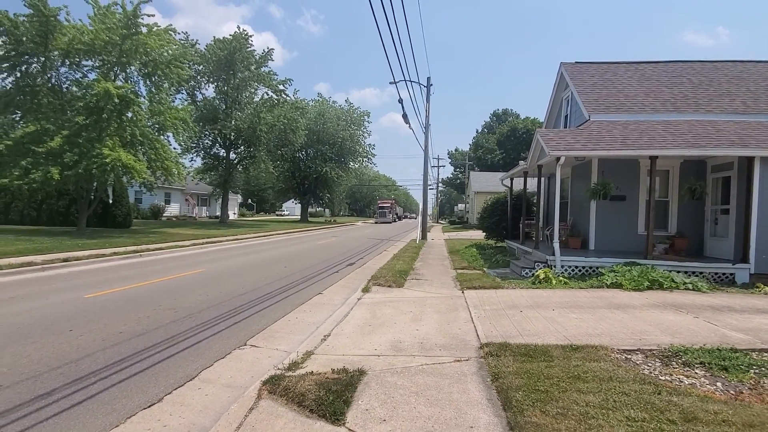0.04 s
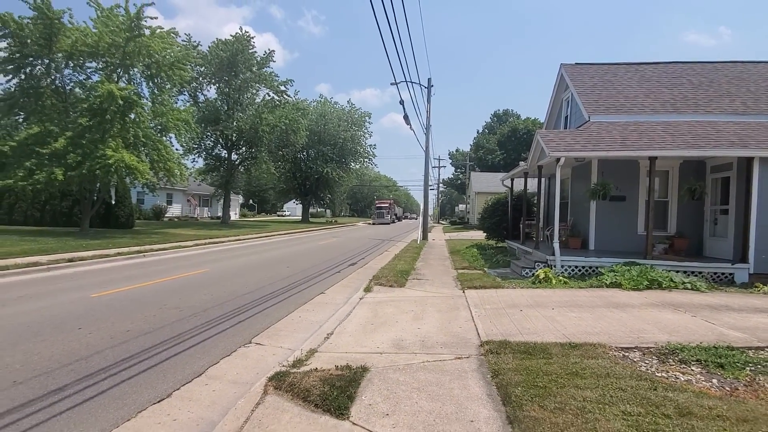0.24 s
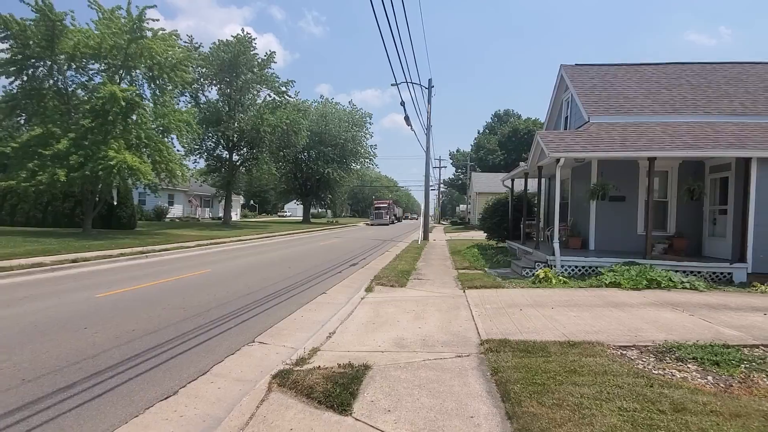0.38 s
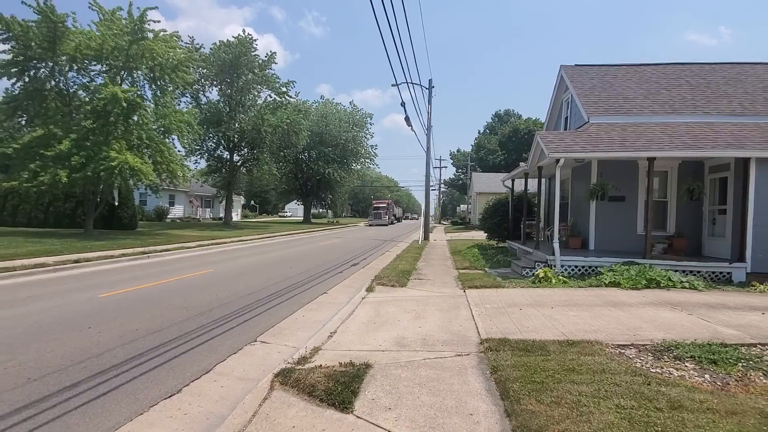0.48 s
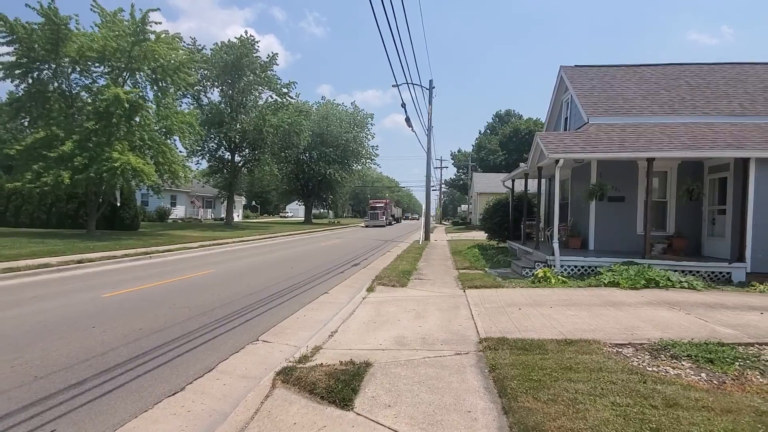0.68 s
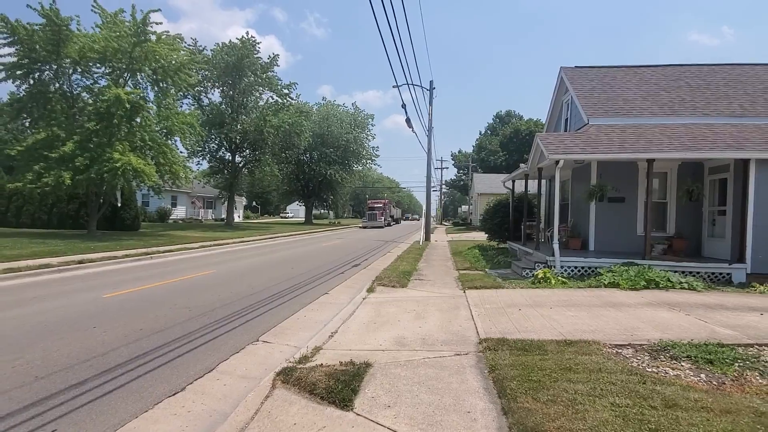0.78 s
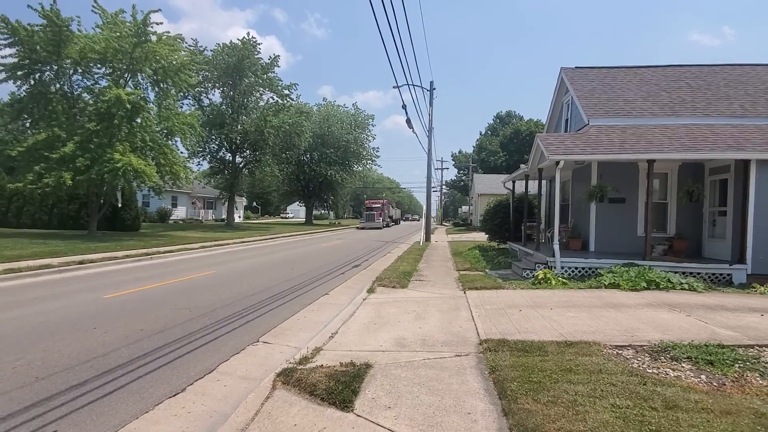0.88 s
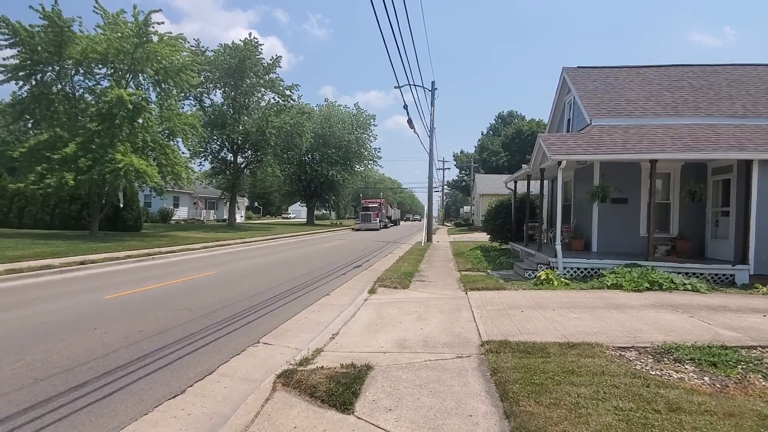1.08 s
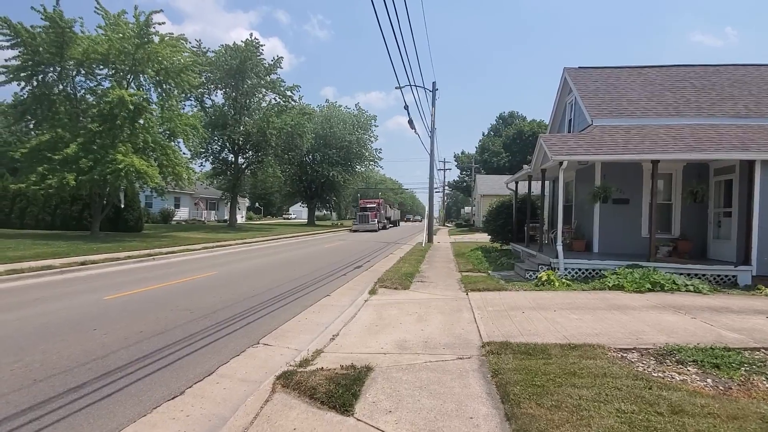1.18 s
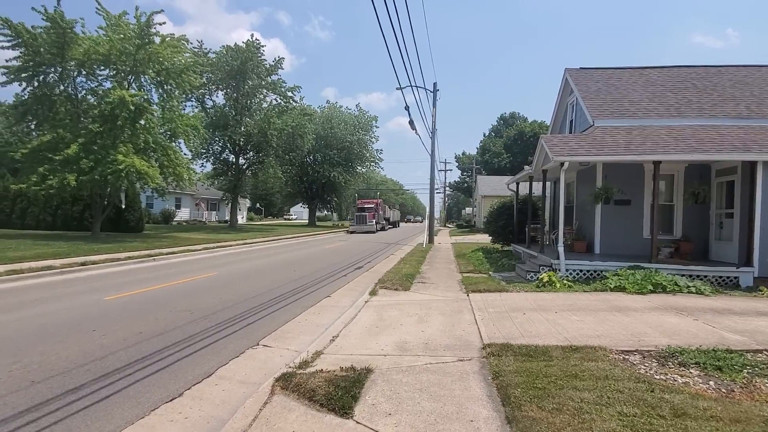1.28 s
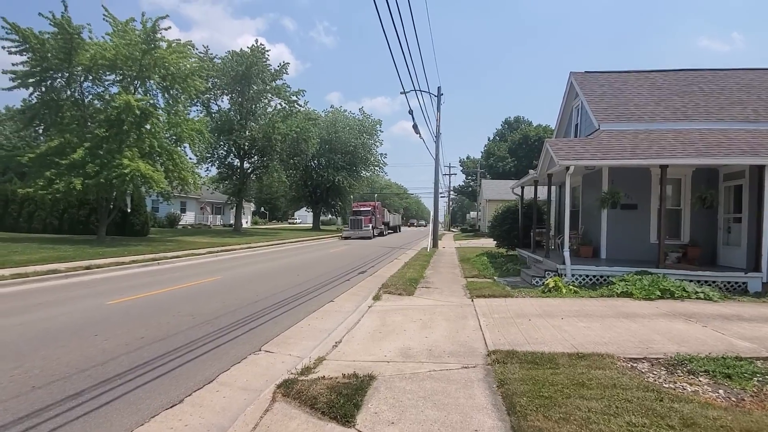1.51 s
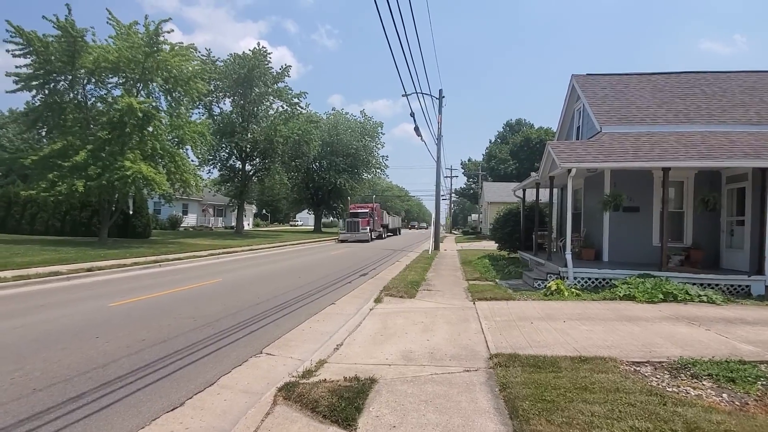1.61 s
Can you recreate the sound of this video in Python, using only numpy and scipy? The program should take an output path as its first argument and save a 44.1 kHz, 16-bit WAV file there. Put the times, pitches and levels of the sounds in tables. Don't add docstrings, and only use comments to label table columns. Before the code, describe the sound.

A truck air horn blasts twice in quick succession, echoing off houses over low traffic rumble.

```python
import sys
import numpy as np
from scipy import signal
from scipy.fft import rfft, irfft, next_fast_len
from scipy.io import wavfile
from scipy.ndimage import map_coordinates

SR = 44100
rng = np.random.default_rng(int(sys.argv[2]) if len(sys.argv) > 2 else 0)


def field_ratio(decibels):
    return 10 ** (np.asarray(decibels, dtype=float) / 20)


def put_to_file(sound):
    columns = np.atleast_2d(sound).T
    safe = np.clip(columns, -1, 1)
    whole_steps = np.round(safe * 32767)
    wavfile.write(sys.argv[1], SR, whole_steps.astype(np.int16))


N = 72765
T = np.arange(N) / SR


def unit(x):
    return x / np.sqrt(np.mean(x ** 2) + 1e-20)


def along(points, hz):
    f, v = np.transpose(points)
    return np.interp(np.log(hz + 1), np.log(f + 1), v)


def wobble(rate_hz):
    knots = rng.standard_normal(int(N * 40 / SR) + 4)
    return map_coordinates(knots, [np.arange(N) * min(rate_hz, 40) / SR])


def filtered(x, response):
    m = next_fast_len(N + SR // 2)
    gain = response(np.fft.rfftfreq(m, 1 / SR))
    return irfft(rfft(x, m) * gain, m)[..., :N]


def rush(spectrum, alike):
    a, b = filtered(rng.standard_normal((2, N)), lambda hz: field_ratio(along(spectrum, hz)))
    u = np.arccos(np.clip(alike, 0, 1)) / 2
    left = np.cos(u) * a + np.sin(u) * b
    right = np.cos(u) * a - np.sin(u) * b
    return unit(np.array([left, right]))


# (time [s], level [dB])
GUST_LEVELS = [(0.0, -40), (0.026, -33.5), (0.334, -40), (0.352, -35), (0.426, -48), (0.458, -34.5),
               (1.028, -41.5), (1.25, -52), (1.304, -39), (1.502, -45), (1.558, -37), (1.65, -39)]
# (frequency [Hz], level [dB])
RUMBLE_SPECTRUM = [(15, -35), (25, -13), (40, -6), (60, 1), (95, 0.5), (125, -11), (170, -48)]
ENGINE_HZ, ENGINE_DB = 52.1, -2


def rumble():
    level = field_ratio(ENGINE_DB + 1.7 * wobble(8.8))
    hz = ENGINE_HZ * (1 + 0.032 * wobble(7.7))
    engine = level * np.sin(2 * np.pi * np.cumsum(hz) / SR)
    gust = field_ratio(np.interp(T, *np.transpose(GUST_LEVELS)) - 1.0)
    return gust * (rush(RUMBLE_SPECTRUM, alike=0.25) + engine) * field_ratio([[-3], [3]])


# (frequency [Hz], level [dB])
ROAD_SPECTRUM = [(90, -27), (140, -0.5), (280, -5), (400, -8), (650, -7), (1300, -9), (2900, -15),
                 (3800, -26), (6000, -70)]
# (frequency [Hz], level [dB])
FAR_SPECTRUM = [(3000, -33), (3600, 0), (8300, -9.5), (8800, -26), (12000, -42), (15500, -56)]
ROAD_DB, FAR_DB = -35, -53.5


def road_noise():
    near = field_ratio(ROAD_DB + 1.44 * wobble(5.88)) * rush(ROAD_SPECTRUM, alike=0.61)
    return near + field_ratio(FAR_DB) * rush(FAR_SPECTRUM, alike=0.16)


OPEN_S, ATTACK_S, SHUT_S, RELEASE_S = 0.203, 0.025, 1.311, 0.033


def valve(delay_s, shut_offset_s, slow=1):
    rise = np.clip((T - OPEN_S - delay_s) / ATTACK_S, 0, 1) ** 1.5
    return rise * np.exp(-np.maximum(T - SHUT_S - shut_offset_s, 0) / (slow * RELEASE_S))


FLUTTER_DB = 2.5
SHARP, SETTLE_S = 0.014, 0.0397
SAG_PER_DB, RELEASE_SAG, JITTER = 0.0005, 0.035, 0.001206
BODY_FOLLOWS, EDGE_FOLLOWS = 0.29, 0.22
BLARE_DB_PER_OCT, BLARE_S, BLARE_WIDE_S = 3, 0.2724, 0.049
ROLL_DB_PER_OCT, UNEVEN_DB = 12, 1


def trumpet(hz, delay_s, shut_offset_s, levels_db, drop_db):
    settle = np.exp(-np.maximum(T - OPEN_S - delay_s, 0) / SETTLE_S)
    bend = 1 + SHARP * settle + SAG_PER_DB * drop_db + JITTER * wobble(25.04)
    bend -= RELEASE_SAG * np.tanh(np.maximum(T - SHUT_S - shut_offset_s, 0) / 0.09)
    phase = 2 * np.pi * np.cumsum(hz * bend) / SR
    blare = np.exp(-((T - BLARE_S) / BLARE_WIDE_S) ** 2)
    edge_db = EDGE_FOLLOWS * drop_db + BLARE_DB_PER_OCT * blare * (hz / 683) ** 3
    reed = 0
    for k in range(1, 13):
        if k <= 6:
            db = levels_db[k - 1]
        else:
            db = levels_db[-1] - ROLL_DB_PER_OCT * np.log2(k / 6) + UNEVEN_DB * rng.normal()
        level_db = db + BODY_FOLLOWS * drop_db + np.log2(k) * edge_db
        flutter_db = FLUTTER_DB * np.tanh(k / 2) * wobble(13.97)
        reed = reed + field_ratio(level_db + flutter_db) * np.cos(k * phase + rng.normal(0, 0.38))
    opening = valve(delay_s, shut_offset_s, (683 / hz) ** 1.5)
    return opening * np.sqrt(2) * reed, phase


# (multiples of low, mid, high trumpet [ratio], level [dB], drift [dB/s])
AIR_LINE_TONES = [((1, 0, 1), -51.5, 4.3), ((0, 1, 1), -45.5, -1.5), ((-1.1, 0.94, 1), -43, -7),
                  ((-1, 2, 0.99), -30.5, -23), ((-2, 2, 0.99), -28.5, -22)]


def sum_tones(phases, drop_db):
    out = np.zeros(N)
    for times, db, drift_db_s in AIR_LINE_TONES:
        tone = np.sqrt(2) * np.sin(np.dot(times, phases))
        level_db = db + drift_db_s * T + drop_db + FLUTTER_DB * wobble(7.93)
        out += valve(0.03, -0.053) * field_ratio(level_db) * tone
    return out


# (frequency [Hz], level [dB])
HISS_SPECTRUM = [(1200, -20), (3000, -5), (4000, -3.5), (5000, -6.5), (8300, -4), (8800, -11), (13500, -16),
                 (15700, -26)]
HISS_DB, GATED = -39.5, 0.32


def air_puffs(phases, drop_db):
    gate = np.sum(np.cos(phases), axis=0)
    puffs = unit(rush(HISS_SPECTRUM, alike=0.99)[0] * np.exp(GATED * gate))
    return valve(0.0046, -0.051) * field_ratio(HISS_DB + drop_db) * puffs


# (time [s], level [dB])
AIR_PRESSURE = [
    (0.236, -44),
    (0.278, -31.5),
    (0.458, -41),
    (0.572, -50.5),
    (0.656, -37),
    (1.048, -36),
    (1.178, -38.5),
    (1.376, -53.5),
    (1.4, -54),
]
# (pitch [Hz], delay [s], shut offset [s], levels of partials 1-6 [dB])
REEDS = [
    (415.5, 0.0118, -0.068, [-27.5, -34.5, -36, -39, -49.5, -48.5]),
    (458.5, 0.0018, -0.056, [-23.5, -37, -36, -40.5, -43.5, -47]),
    (682.8, 0.0022, 0.0049, [-23.5, -26, -40, -35, -41, -47]),
]
FULL_DB, ATTACK_LEAD_DB = -36.5, 5


def horn():
    drop_db = np.interp(T, *np.transpose(AIR_PRESSURE)) - FULL_DB
    lead_db = ATTACK_LEAD_DB * np.clip((AIR_PRESSURE[1][0] - T) / 0.045, 0, 1)
    chord, phases = np.zeros(N), []
    for hz, delay_s, shut_offset_s, levels_db in REEDS:
        tone, phase = trumpet(hz, delay_s, shut_offset_s, levels_db, drop_db)
        chord += field_ratio(lead_db) * tone
        phases.append(phase)
    return chord + sum_tones(phases, drop_db) + air_puffs(phases, drop_db)


# (frequency [Hz], level difference [dB])
DIRECT_BALANCE = [(450, -5), (700, -2), (1400, -9), (5000, 5.5), (12000, -16)]


def direct(x):
    return filtered(x, lambda hz: field_ratio(np.outer([0.5, -0.5], along(DIRECT_BALANCE, hz))))


# (truck abreast [s], distance from lane [m], level [dB], left-right [dB])
HOUSE_FRONTS = [(1.17, 7, 0.5, -1.5), (.95, 8, -6, 3), (-.3, 8, -8, -3.5), (.45, 7, -7.5, 1.5),
                (1.8, 10, -11, -4.5), (.1, 10, -9, 0.5), (8, 12, -6, 2), (-2.5, 12, -6, -2),
                (0.8, 35, -16.5, 3), (-0.76, 22, -12.5, -3)]
# (frequency [Hz], level [dB])
WALL_RETURN = [(300, -18.5), (450, -10.5), (680, 1.5), (1400, -2), (3000, 4.5), (8000, 3), (15000, -9)]
SPEED_M_S, START_M, KERB_M = 14.5, 70, 4.01
CLUTTER_DB, BACK_DB, SHIMMER_DB = -13, -2, 3
PORT_S = 0.0002


def houses(x):
    draw = rng.uniform(size=(16, 4))
    clutter = [(-1.5 + 4.5 * a, 4 + 14 * b, CLUTTER_DB + 6 * c, 10 * d - 5) for a, b, c, d in draw]
    direct_m = np.hypot(START_M - SPEED_M_S * T, KERB_M)
    coeffs = signal.cspline1d(x)
    out = np.zeros((2, N))
    for abreast_s, side_m, db, pan_db in HOUSE_FRONTS + clutter:
        ahead_m = SPEED_M_S * (abreast_s - T)
        reach_m = np.hypot(ahead_m, side_m)
        return_m = np.hypot(START_M - SPEED_M_S * abreast_s, side_m)
        extra_m = np.maximum(reach_m + return_m - direct_m, 0)
        level_db = db + SHIMMER_DB * wobble(11.98) + BACK_DB * (1 - ahead_m / reach_m)
        beam = field_ratio(level_db) * side_m / reach_m
        for ch, sign in enumerate((1, -1)):
            late = (extra_m / 343 - sign * PORT_S * pan_db / 10) * SR
            echo = map_coordinates(coeffs, [np.arange(N) - late], prefilter=False)
            out[ch] += beam * field_ratio(sign * pan_db / 2) * echo
    return filtered(out, lambda hz: field_ratio(along(WALL_RETURN, hz)))


# (frequency [Hz], t60 [s])
STREET_T60 = [(300, 0.58), (1500, 0.71), (6000, 0.36)]
STREET_DB, STREET_S = -9, 0.04


def street(x):
    hz, t, z = signal.stft(rng.standard_normal((2, SR)), SR, nperseg=256)
    decay = field_ratio(-60 * t / along(STREET_T60, hz)[:, None])
    tail = signal.istft(z * decay, SR, nperseg=256)[1]
    late = np.pad(x, ((0, 0), (int(STREET_S * SR), 0)))
    wet = signal.fftconvolve(late, tail / np.linalg.norm(tail[0]), axes=1)[:, :N]
    return field_ratio(STREET_DB) * wet


DUCK_DB, DUCK_S, RECOVER_S = 10.5, 0.44, 0.12


def gain_control():
    sink = 1 - np.exp(-np.maximum(T - OPEN_S, 0) / DUCK_S)
    recover = np.exp(-np.maximum(T - SHUT_S, 0) / RECOVER_S)
    return field_ratio(-DUCK_DB * sink * recover)


def scene():
    traffic = rumble() + gain_control() * road_noise()
    blast = horn()
    near = direct(blast) + houses(blast)
    return traffic + near + street(near)


def top_cut(x):
    return signal.sosfilt(signal.butter(12, 15810, fs=SR, output="sos"), x)


def record(dry):
    mix = filtered(dry, lambda hz: hz < 15790)
    return top_cut(mix)


dry = scene()
out = record(dry)
put_to_file(out)
```